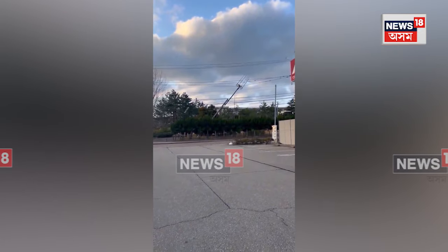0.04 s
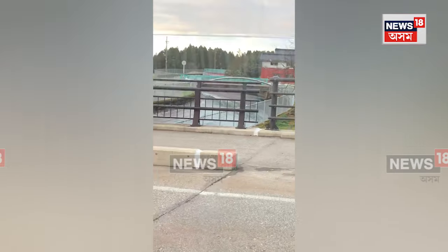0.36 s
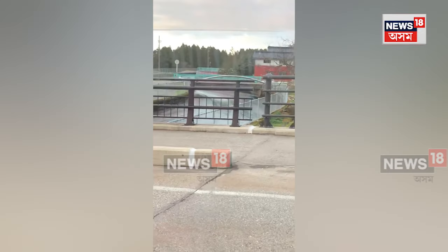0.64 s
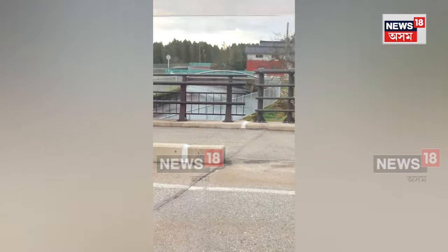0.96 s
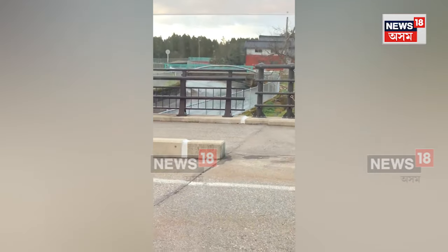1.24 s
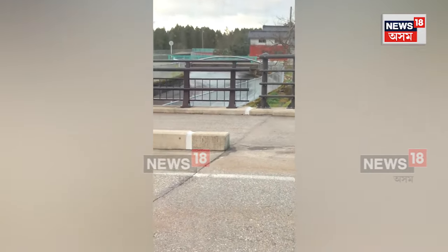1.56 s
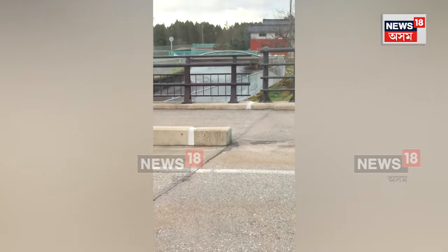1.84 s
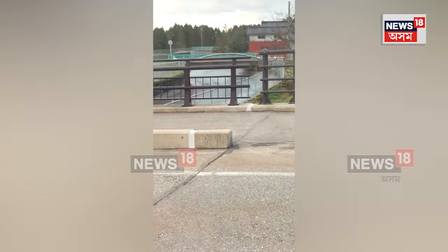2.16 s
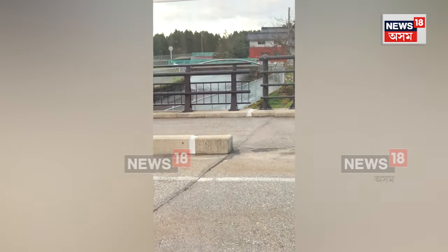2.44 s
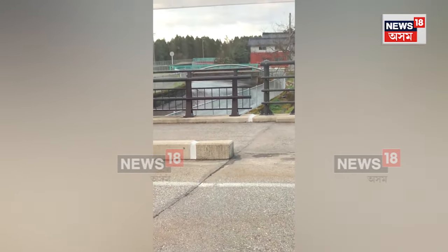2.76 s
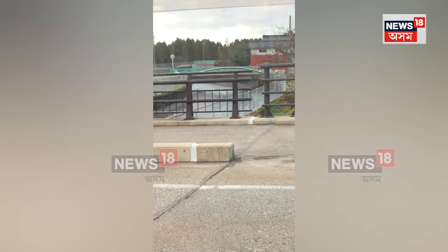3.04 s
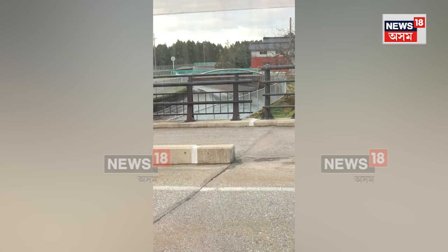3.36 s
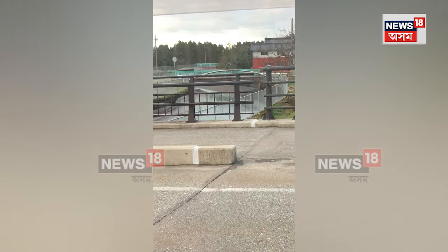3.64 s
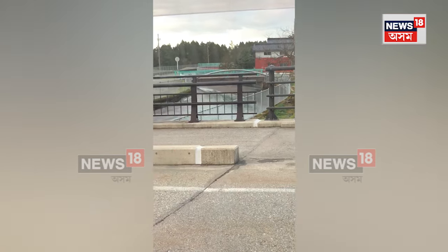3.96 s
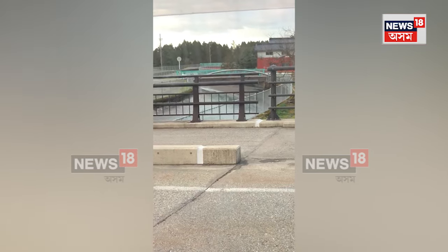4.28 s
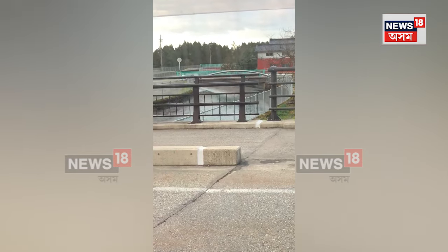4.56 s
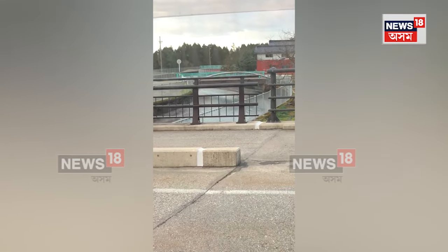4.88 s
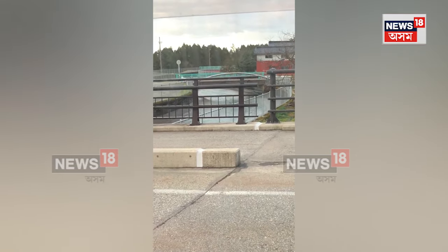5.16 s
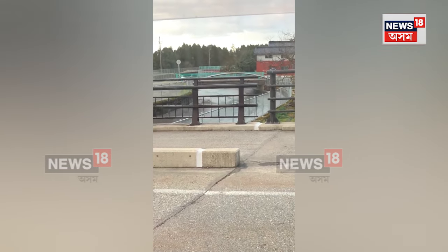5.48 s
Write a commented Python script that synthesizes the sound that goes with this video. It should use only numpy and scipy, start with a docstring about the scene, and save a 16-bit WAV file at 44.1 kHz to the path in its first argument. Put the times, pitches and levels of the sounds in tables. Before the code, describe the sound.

Heard from inside a standing car, an engine idles with a low, even hum and a light cabin hiss while the turn signal clicks behind the dashboard in a regular tick-tock. Before this, there is only a short burst of dull rumble and rushing air, broken off by a moment of silence. A soft bump, a gentle passing swish and faint ticks from the trim sit under the clicking.

```python
"""A dull car rumble with a rush of air sounds for a moment, then cuts to a short silence.
Then, quieter, the inside of a standing car: a four-cylinder engine idles, its firings shaking the body
into a low hum under the cabin hiss. The indicator relay ticks and tocks as its armature pulls in and
lets go behind the dashboard. Loose trim gives a bump and faint ticks, and a soft swish rises and fades."""
import sys
import numpy as np
from scipy import signal
from scipy.fft import rfft, irfft, next_fast_len
from scipy.io import wavfile

SR = 44100
rng = np.random.default_rng(int(sys.argv[2]) if len(sys.argv) > 2 else 0)


def transcribe(u):
    """Save the signal u as a 16-bit wav file named by the first command-line argument.

    u: samples, shape (n,) or (channels, n), limited to [-1, 1]; the rate is SR.
    q: integer samples, one column per channel.
    """
    v = np.clip(np.atleast_2d(u).T, -1, 1)
    q = np.round(v * 32767).astype(np.int16)
    wavfile.write(sys.argv[1], SR, q)


N = 252252
TIME = np.arange(N) / SR


def from_db(db):
    """Decibels to gain."""
    return 10 ** (np.asarray(db) / 20)


def rms_one(x):
    """Scale to an rms of 1."""
    return x / np.sqrt(np.mean(x ** 2) + 1e-20)


def fader(points, offset_db=0):
    """A gain curve through (time_s, level_db) points."""
    return from_db(np.interp(TIME, *np.transpose(points)) + offset_db)


def drift(rate_hz):
    """A slow random wobble with an rms of 1."""
    hop, settle = 40, 2000
    pole = np.exp(-2 * np.pi * rate_hz * hop / SR)
    white = rng.standard_normal(N // hop + settle + 2)
    slow = signal.lfilter([1], [1, -2 * pole, pole * pole], white)[settle:]
    return np.interp(np.arange(N) / hop, np.arange(len(slow)), rms_one(slow))


def noise(colour):
    """Noise shaped by (freq_hz, level_db) points, rolling off below the lowest; rms 1."""
    hz, db = np.transpose(colour)
    size = next_fast_len(N)
    bin_hz = np.maximum(np.arange(size // 2 + 1) * SR / size, 1)
    eq = from_db(np.interp(np.log(bin_hz), np.log(hz), db))
    low_cut = np.minimum(bin_hz / hz[0], 1) ** 2
    return rms_one(irfft(rfft(rng.standard_normal(size)) * eq * low_cut, size)[:N])


def band(x, hz, width_hz):
    """A resonance with steep skirts."""
    edges = np.clip([hz - width_hz / 2, hz + width_hz / 2], 10, .45 * SR)
    return signal.sosfilt(signal.butter(2, edges, "band", fs=SR, output="sos"), x)


def tone(cycles, db, waver):
    """A sine whose strength and phase waver by the given share."""
    angle = 2 * np.pi * cycles
    wave = (1 + waver * drift(7.9)) * np.cos(angle) + waver * drift(10) * np.sin(angle)
    return np.sqrt(2) * from_db(db) * wave


def noise_ping(peak_db, hz, t60_s, width_share=0.46):
    """A short ring of noise around one pitch."""
    t = np.arange(SR // 6) / SR
    burst = rng.standard_normal(len(t)) * from_db(-60 * t / t60_s)
    ring = band(burst, hz, width_share * hz)
    return from_db(peak_db) * ring / np.abs(ring).max()


def add(out, start_s, sound):
    """Mix a short sound in at start_s."""
    at = max(int(start_s * SR), 0)
    out[at:at + len(sound)] += sound[:len(out) - at]


# colour of the dull rumble: freq_hz, relative_db
RUMBLE_COLOUR = [(21, -69.5), (35, -28), (48, -6), (129, -7.5), (183, -4.5), (260, -11.5), (298, -7),
                 (518, -16.5), (700, -24.5), (910, -63), (1540, -120)]
# its fader moves: time_s, level_db
RUMBLE_FADER = [(0.0, -48), (0.042, -39.5), (0.072, -47.5), (0.15, -45.5), (0.178, -49.5), (0.218, -44.5),
                (0.34, -43.5), (0.42, -44)]
# tones booming through it: pitch_hz, level_db
BOOM_TONES = [(64, -53.5), (184, -50.5), (1352, -68.5)]


def car_rumble():
    """A dull, uneven car rumble with wavering, booming tones."""
    rumble = fader(RUMBLE_FADER, offset_db=0.6) * noise(RUMBLE_COLOUR)
    boom = sum(tone(hz * TIME + rng.random(), db, waver=0.38) for hz, db in BOOM_TONES)
    return rumble + boom


# colour of the rushing air up to about 6.5 kHz, a barely audible hiss floor above: freq_hz, relative_db
RUSH_AND_FLOOR_COLOUR = [(700, -4.5), (850, 0), (1080, -5), (1450, -1.5), (2000, -4), (3200, -10),
                         (5600, -10), (6550, -22.5), (7000, -41), (9500, -41), (12000, -50.5), (14000, -71)]
# fader moves of both: time_s, level_db
RUSH_FADER = [(0.0, -62.5), (0.014, -56), (0.024, -60), (0.156, -57.5), (0.178, -61.5), (0.196, -56.5),
              (0.382, -56), (0.42, -57)]
# fader moves of the midrange swell: time_s, level_db
SWELL_FADER = [(0.0, -68), (0.044, -59), (0.158, -65), (0.228, -61), (0.242, -54), (0.33, -55),
               (0.348, -66), (0.366, -57), (0.42, -58.5)]


def air_rush():
    """A rush of air swells in the midrange, with a faint hiss floor on top and one tiny opening squeak."""
    rush_and_floor = fader(RUSH_FADER, offset_db=1) * noise(RUSH_AND_FLOOR_COLOUR)
    mids = rms_one(band(rng.standard_normal(N), hz=1092, width_hz=310))
    out = rush_and_floor + fader(SWELL_FADER, offset_db=-1) * mids
    add(out, .004, noise_ping(peak_db=-53, hz=3130, t60_s=0.07, width_share=0.031))
    return out


# engine hum: multiple of the firing rate, level_db
ENGINE_ORDERS = [(1, -58.5), (1.5, -70), (2, -49), (2.5, -72.5), (3, -54), (4, -57), (4.5, -63.5), (5, -61),
                 (5.5, -67), (6, -63), (8, -68), (9, -59), (10, -64), (11, -67.5), (12, -65), (13, -69.5)]
# whine of belt-driven parts and fan: pitch_hz, level_db
BELT_AND_FAN = [(125.5, -67), (140, -57.5), (280, -65.5), (309, -65.5), (377, -70), (506, -73), (637, -73),
                (758, -76.5), (841, -78)]
# colour of the idle rumble in the cabin: freq_hz, relative_db
IDLE_COLOUR = [(25, -9), (45, -4.5), (75, 2), (100, -3.5), (135, 3.5), (205, 0.5), (265, 1.5), (335, -4.5),
               (375, -1.5), (430, -2.5), (580, -7), (730, -6), (950, -16), (1500, -22.5), (3000, -56.5)]


def engine(firing_hz=29.03, speed_wander=0.001995, rumble_db=-52.5, throb_db=1.17, mount_lag_cycles=.35):
    """Firings shake the body: clean low orders, rougher high ones, a rumble throbbing with each firing."""
    firings = np.cumsum(firing_hz * (1 + speed_wander * drift(1))) / SR
    hum = 0
    for order, db in ENGINE_ORDERS:
        # above the engine mounts' resonance the shaking lags; high orders arrive by scattered paths
        scatter = rng.random() * (order > 3)
        lag = mount_lag_cycles * (order > 1) + scatter
        hum += tone(order * firings - lag, db, waver=0.023 + 0.028 * order)
    whine = sum(tone(hz * TIME + rng.random(), db, waver=0.29) for hz, db in BELT_AND_FAN)
    throb = from_db(throb_db * np.sin(2 * np.pi * firings))
    return hum + whine + from_db(rumble_db) * throb * noise(IDLE_COLOUR)


# colour of the cabin hiss: freq_hz, relative_db
HISS_COLOUR = [(500, -4), (900, 1), (1350, 2), (1500, -1.5), (1800, -0.5), (2300, -6.5), (3200, -6.5),
               (4000, -6.5), (5000, -12), (7000, -16.5), (10000, -19), (15500, -21.5)]


def cabin_hiss(level_db=-64, flutter_db=1):
    """A steady bed of hiss with a slight flutter."""
    return from_db(level_db + flutter_db * drift(29)) * noise(HISS_COLOUR)


# relay and housing modes, levels per unit bandwidth: pitch_hz, width_hz, pull_in_db, let_go_db
RELAY_MODES = [(720, 250, 2.5, -6), (1273, 165, 2.5, -1.5), (1750, 390, -3, -8), (2382, 195, -2, -8),
               (2610, 72, -7, -26), (2824, 280, -1.5, -13.5), (3120, 94, -21, -8), (3290, 290, -6.5, -2),
               (3903, 88, 1, 5), (4140, 180, -9, -4), (4700, 450, -8, -4), (5090, 140, -3, -2),
               (5480, 230, -2.5, -3.5), (5780, 210, -6, -0.5), (6150, 200, -16, 1.5), (6670, 320, 0, -2.5),
               (6990, 210, -3.5, -1.5), (8600, 4500, -13, -11.5), (9850, 830, -10, -4),
               (10820, 340, -6.5, -4.5), (11370, 360, -6, -7), (12240, 790, -15, -4), (12950, 240, -5, -8),
               (14000, 1000, -14, -10), (15150, 300, -15, -8)]


def relay_click(t, paths, letting_go, rise_s=0.0017, chatter_t60_s=0.044, tail_db=-22, tail_t60_s=0.18):
    """The armature lands and chatters; each mode scatters behind the dashboard and dies away."""
    hold_s = .009 if letting_go else .007
    attack = np.minimum(t / rise_s, 1)
    click = 0
    for (hz, width_hz, pull_in_db, let_go_db), path in zip(RELAY_MODES, paths):
        age = t * (hz / 5000) ** 0.11  # decay times hold at 5 kHz; higher modes die sooner
        chatter = from_db(-60 * np.maximum(age - hold_s, 0) / chatter_t60_s)
        tail = from_db(tail_db - 60 * age / tail_t60_s)
        ring = rms_one(band(path * attack * (chatter + tail), hz, width_hz))
        click += from_db(let_go_db if letting_go else pull_in_db) * np.sqrt(width_hz) * ring
    return click / np.sqrt(np.sum(click ** 2) / (SR * hold_s))


# dashboard panel modes: pitch_hz, relative_db, peak_time_s
PANEL_MODES = [(709, 0.5, 0.0021), (1355, -18, 0.0018)]
# the direct knock and its returns from windscreen and doors: delay_s, relative_db
CABIN_ECHOES = [(0, 0), (.0095, -9), (.0178, -11.5)]


def panel_knock(t):
    """The relay knocks the dashboard panel: a few hollow cycles, followed by their echoes."""
    knock = 0
    for hz, db, peak_s in PANEL_MODES:
        envelope = (t / peak_s * np.exp(1 - t / peak_s)) ** 2
        knock += from_db(db) * envelope * np.sin(2 * np.pi * hz * t)
    out = np.zeros(len(t))
    for delay_s, db in CABIN_ECHOES:
        add(out, delay_s, from_db(db) * knock)
    return out


# relay strokes, pulling in and letting go by turns: start_s, base_level_db
RELAY_STROKES = [(0.9213, -35.5), (1.2813, -37), (1.6403, -37.5), (2.0003, -35), (2.3598, -36.5),
                 (2.7198, -37), (3.0793, -36), (3.4393, -37), (3.7983, -36.5), (4.1588, -37),
                 (4.5178, -36.5), (4.8778, -37), (5.2373, -36.5), (5.5973, -37)]


def indicator(click_db=-8, pull_knock_db=-1.6, let_go_knock_db=-7, knock_lag_s=0.00249, variation=.35):
    """Strokes repeat almost alike: pulling in knocks harder, letting go is brighter and chatters longer."""
    t = np.arange(SR // 8) / SR
    paths = rng.standard_normal((2, len(RELAY_MODES), len(t)))  # one noise per direction and mode
    knock = panel_knock(t)
    out = np.zeros(N)
    for stroke, (start_s, base_db) in enumerate(RELAY_STROKES):
        letting_go = stroke % 2
        varied_paths = paths[letting_go] + variation * rng.standard_normal(paths[0].shape)
        add(out, start_s, from_db(base_db + click_db) * relay_click(t, varied_paths, letting_go))
        knock_db = let_go_knock_db if letting_go else pull_knock_db
        add(out, start_s + knock_lag_s, from_db(base_db + knock_db) * knock)
    return out


# small hits in the cabin trim: start_s, peak_db, pitch_hz, t60_s
TRIM_HITS = [(1.139, -40, 132, .14), (2.0435, -56, 7000, 0.008), (2.549, -52.5, 4900, 0.03),
             (2.608, -57.5, 9500, .05), (4.44, -61.5, 7000, .035)]


def loose_trim():
    """Loose trim gives one soft bump and a few tiny ticks."""
    out = np.zeros(N)
    for start_s, peak_db, hz, t60_s in TRIM_HITS:
        add(out, start_s, noise_ping(peak_db, hz, t60_s))
    return out


# colour of the swish: freq_hz, relative_db
SWISH_EQ = [(500, 14.5), (1200, 7), (2500, 1.5), (4000, 1), (7000, -6), (11000, -10), (15500, -15)]
# its fader moves: time_s, level_db
SWISH_FADER = [(0, -90), (1.35, -98), (1.6, -64), (1.8, -59), (1.95, -59), (2.18, -61), (2.32, -72),
               (2.6, -83), (3, -88), (5.72, -75)]


def swish():
    """A soft swish of noise rises and fades, then creeps faintly back toward the end."""
    return fader(SWISH_FADER) * noise(SWISH_EQ)


def scene(rumble_end_s=.4337, idle_start_s=.616):
    """The opening rumble, a silence, then the idling car, in mono."""
    opening = car_rumble() + air_rush()
    cabin = engine() + cabin_hiss() + indicator() + loose_trim() + swish()
    return (opening * (TIME < rumble_end_s) + cabin * (TIME > idle_start_s))[None]


def record(dry, cutoff_hz=15750):
    """A steep low-pass takes off the very top."""
    return signal.sosfilt(signal.ellip(10, .2, 70, cutoff_hz, fs=SR, output="sos"), dry)


dry = scene()
out = record(dry)
transcribe(out)
```